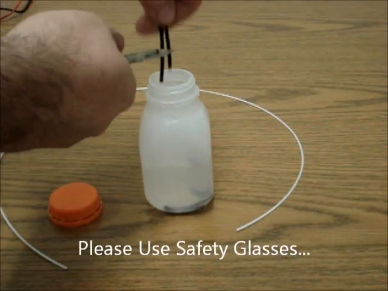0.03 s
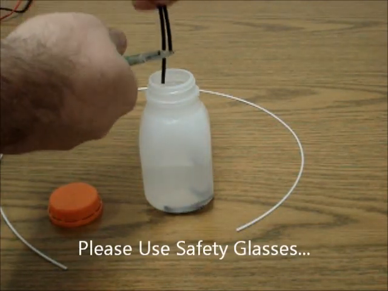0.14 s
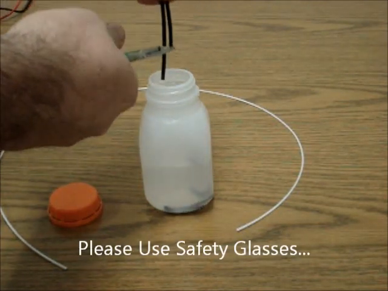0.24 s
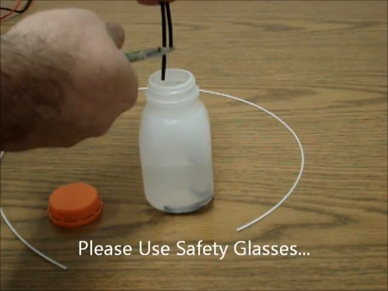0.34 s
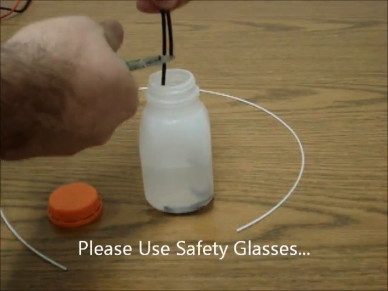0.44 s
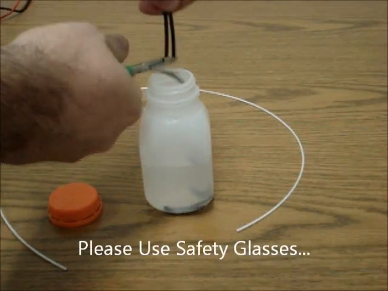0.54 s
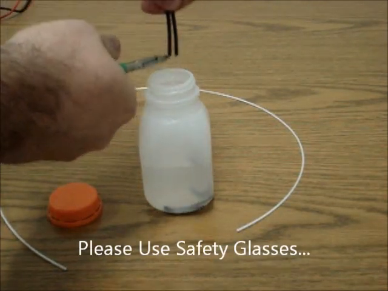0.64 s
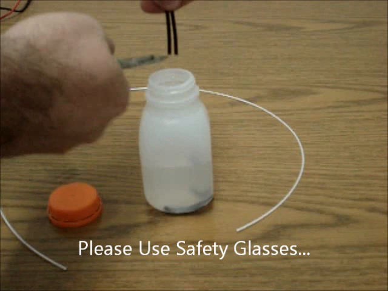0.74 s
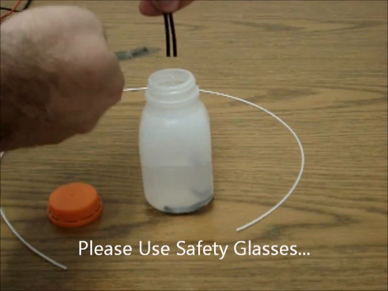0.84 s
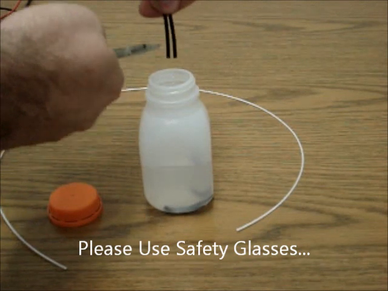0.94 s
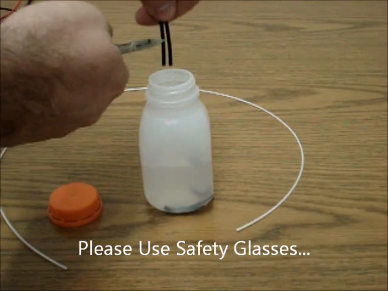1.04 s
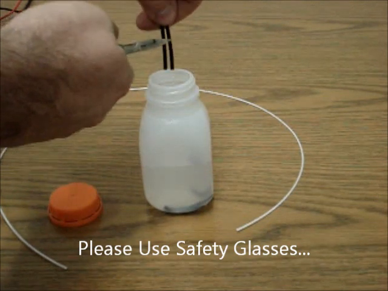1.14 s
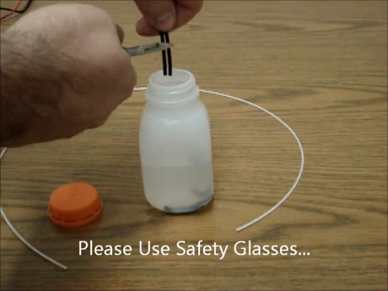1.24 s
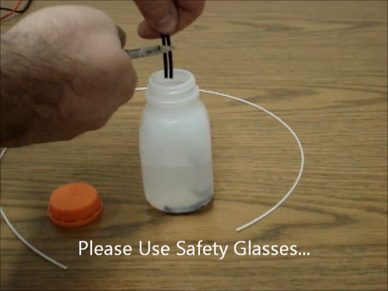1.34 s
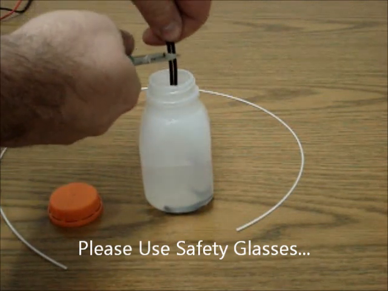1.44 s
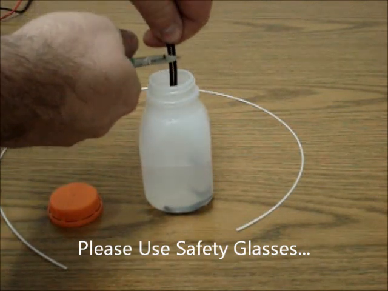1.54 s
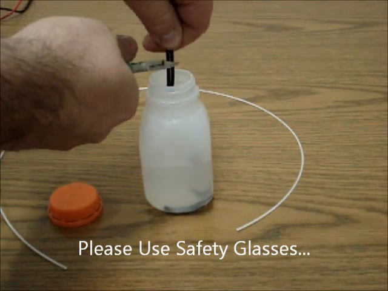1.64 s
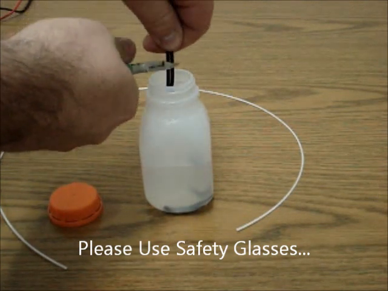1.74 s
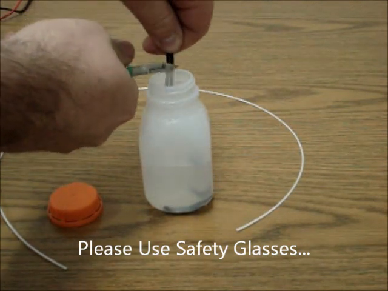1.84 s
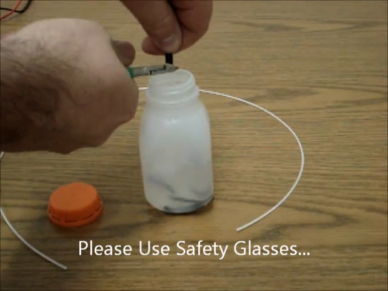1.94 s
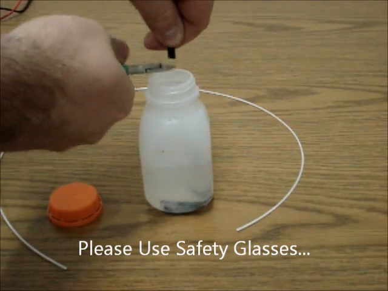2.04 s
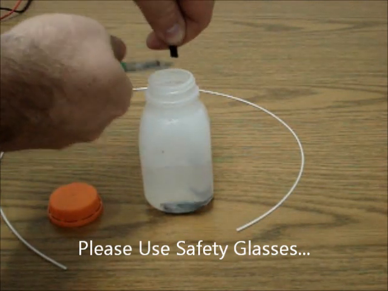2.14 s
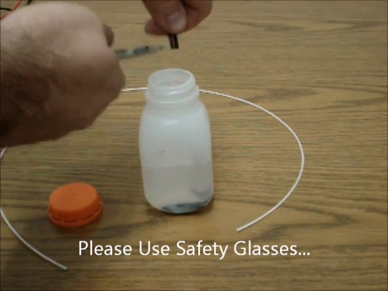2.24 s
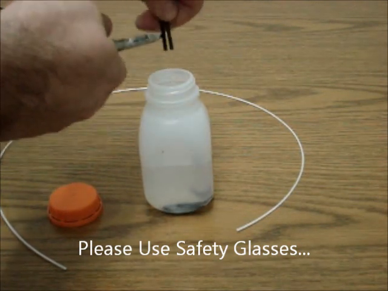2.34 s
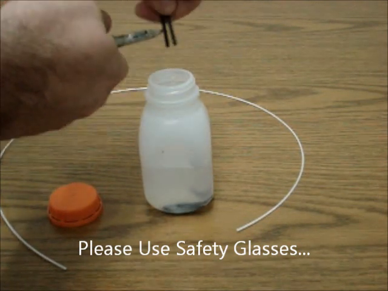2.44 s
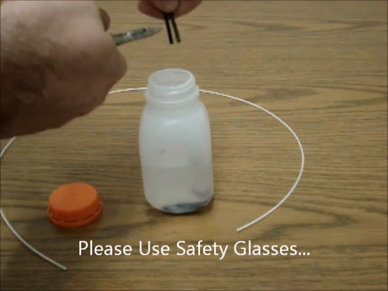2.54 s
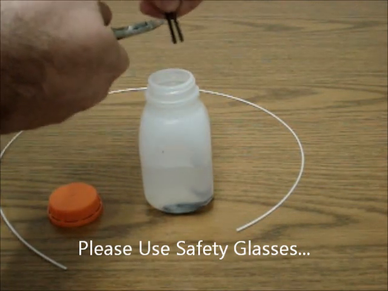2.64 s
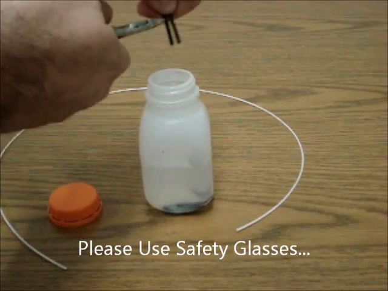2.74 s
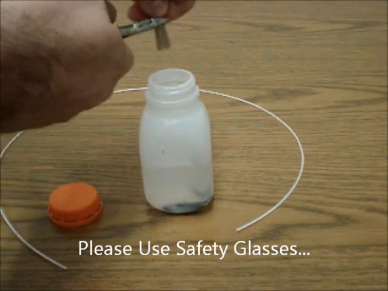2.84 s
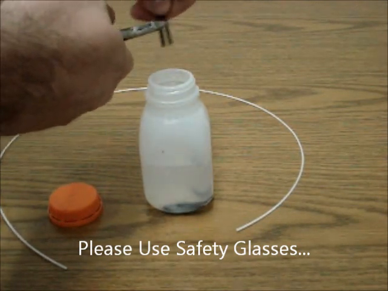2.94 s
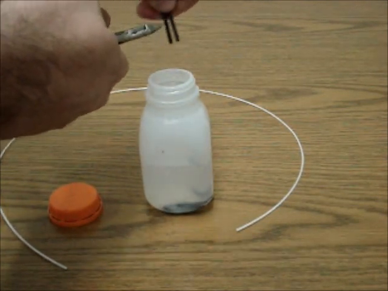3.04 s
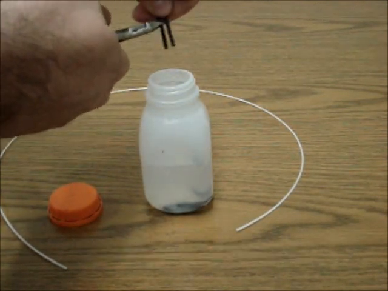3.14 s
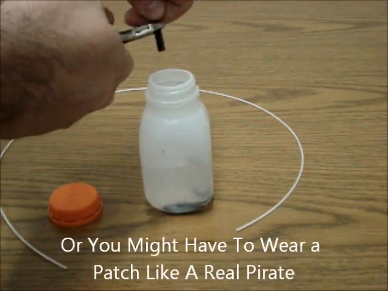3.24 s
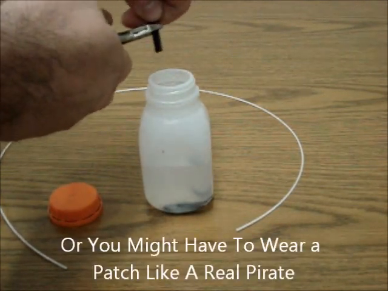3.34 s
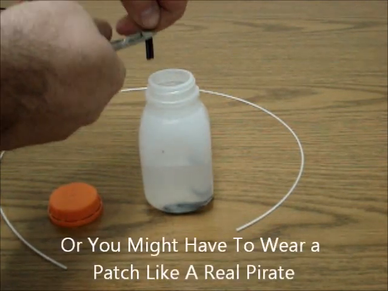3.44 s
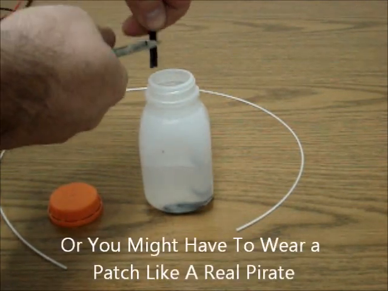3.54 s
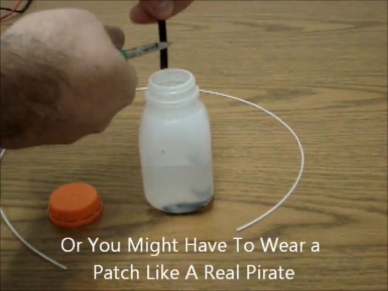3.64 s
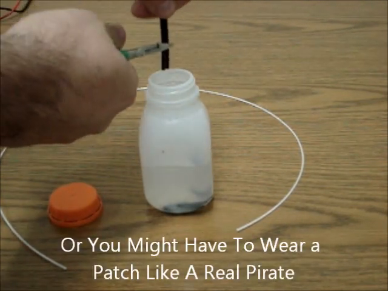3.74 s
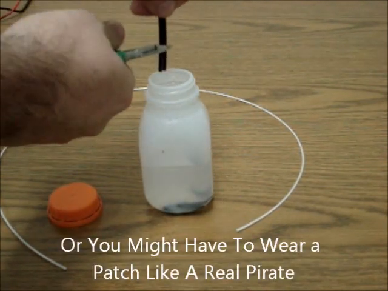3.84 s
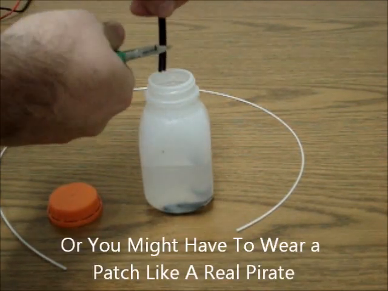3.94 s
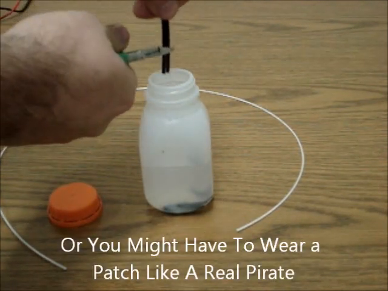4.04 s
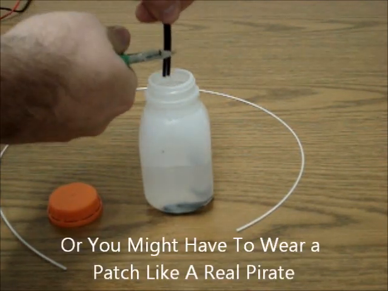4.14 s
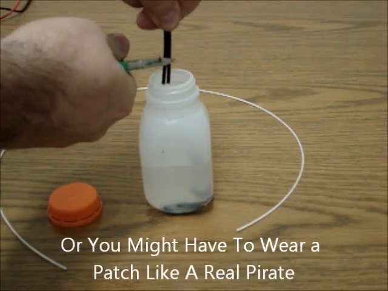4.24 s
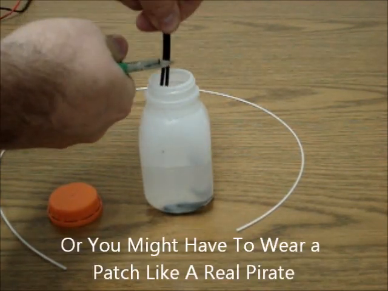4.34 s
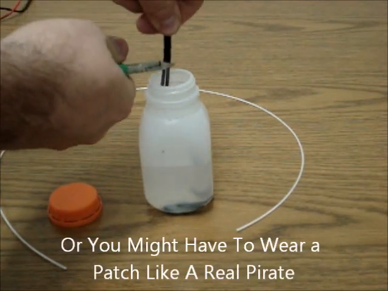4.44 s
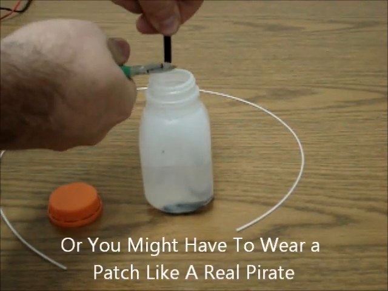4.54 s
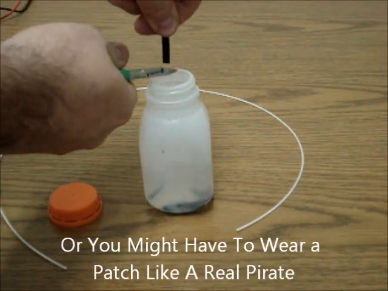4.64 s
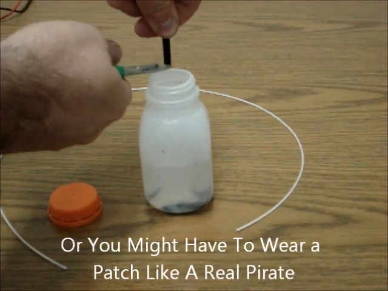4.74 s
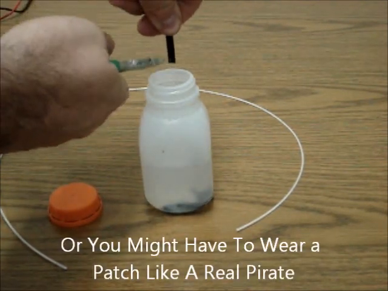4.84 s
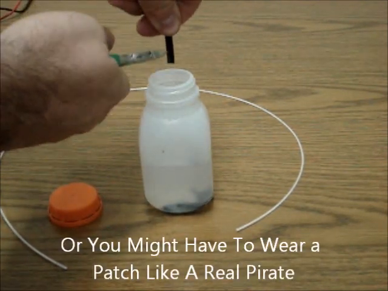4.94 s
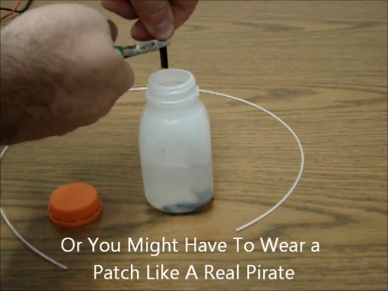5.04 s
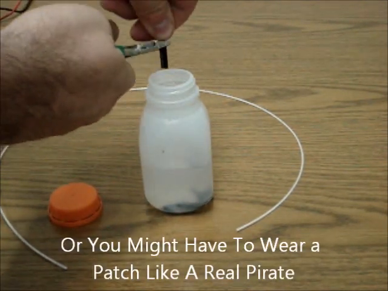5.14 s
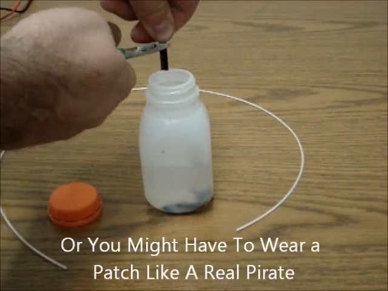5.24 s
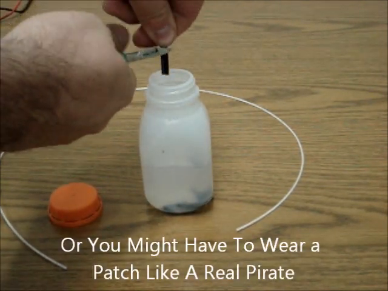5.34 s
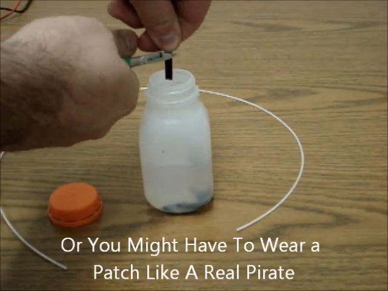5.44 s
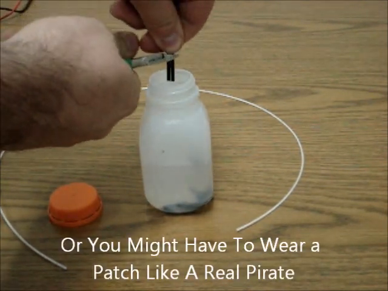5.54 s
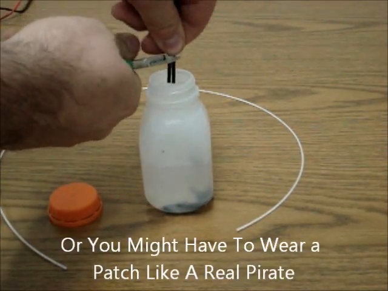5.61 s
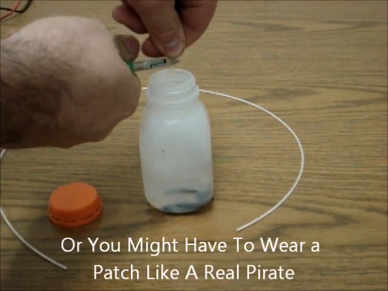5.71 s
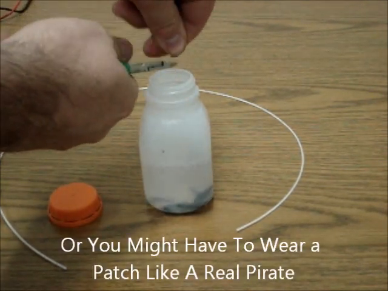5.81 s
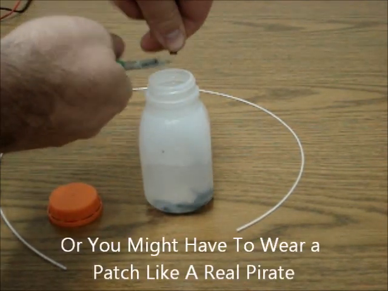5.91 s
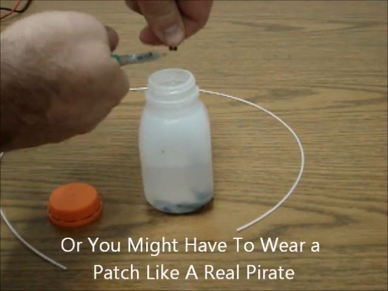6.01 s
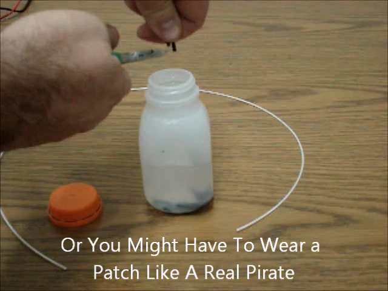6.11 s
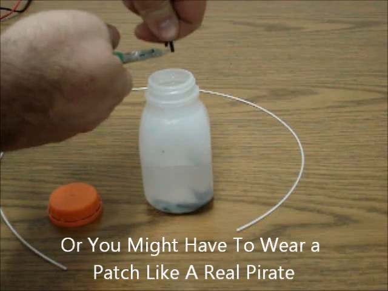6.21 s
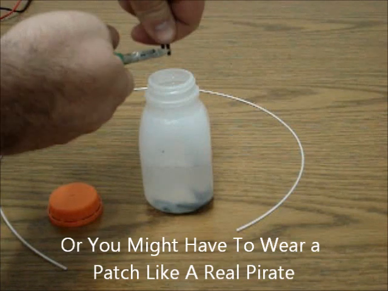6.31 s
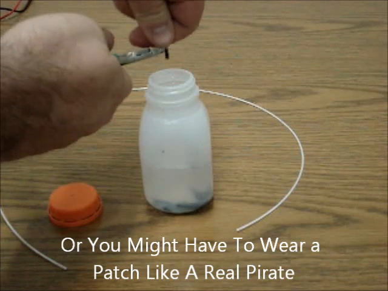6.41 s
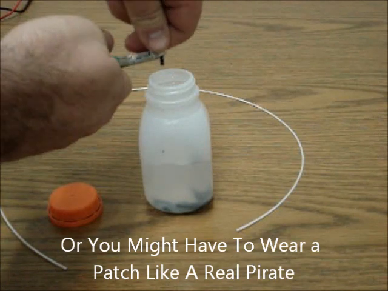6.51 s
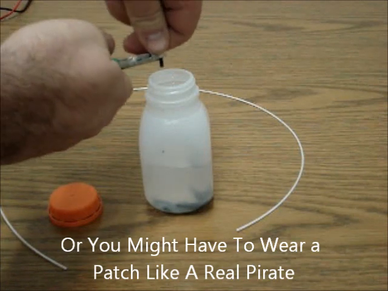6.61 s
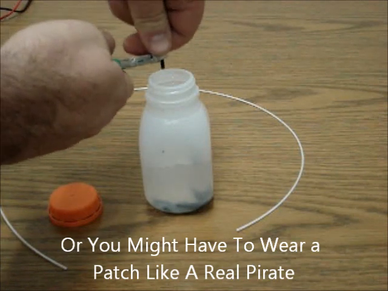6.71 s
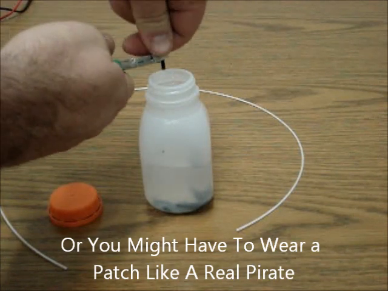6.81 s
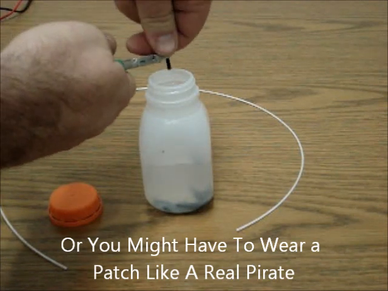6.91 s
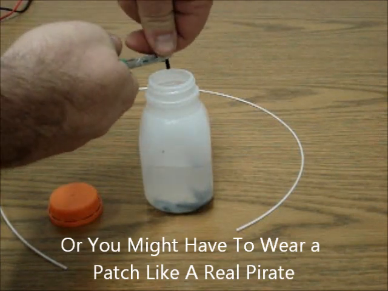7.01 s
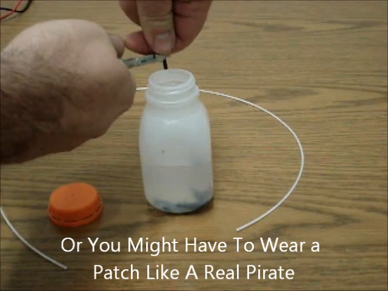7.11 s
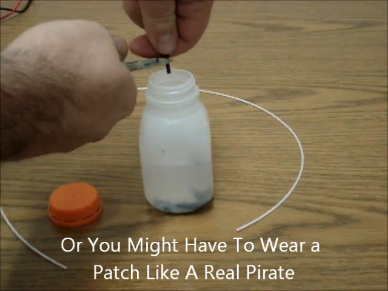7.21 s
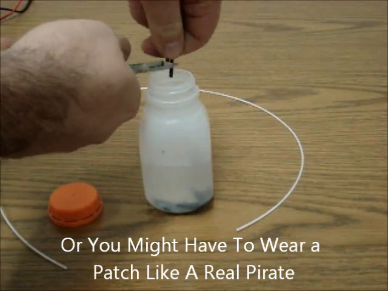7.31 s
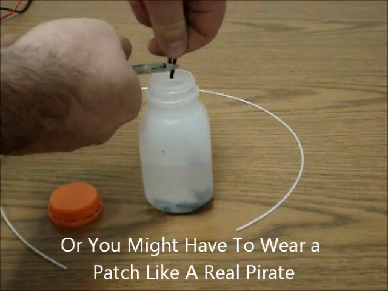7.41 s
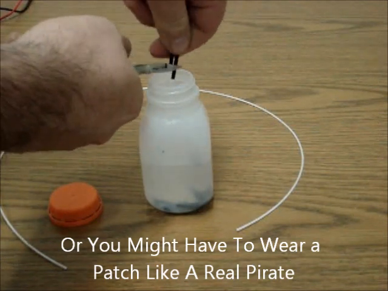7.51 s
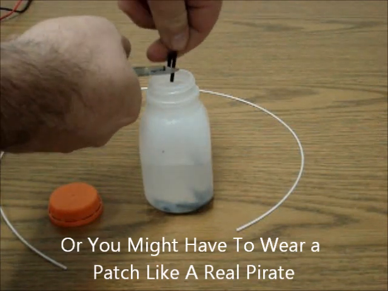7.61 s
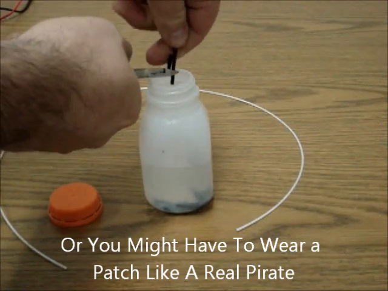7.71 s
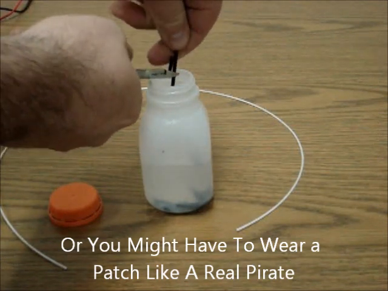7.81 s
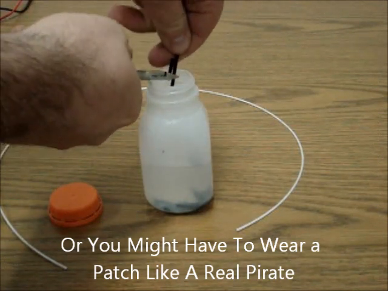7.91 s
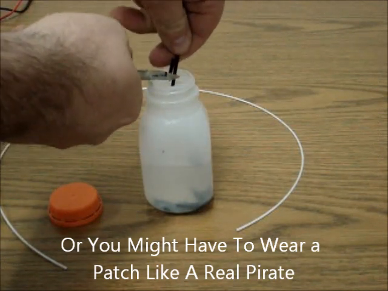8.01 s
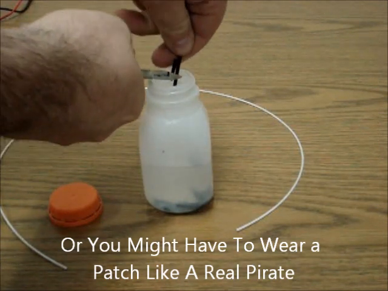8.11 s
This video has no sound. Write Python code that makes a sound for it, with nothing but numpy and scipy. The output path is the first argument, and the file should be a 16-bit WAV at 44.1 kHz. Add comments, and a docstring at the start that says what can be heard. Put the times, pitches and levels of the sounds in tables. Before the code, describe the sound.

A quiet bench, recorded close with a limited, slightly dull top end. Cutter jaws snap crisply with a little puff of bass, then plastic pieces clatter for a fraction of a second against a ringing bottle wall and skip dryly over the bench. This happens four times at uneven intervals, with short room echoes. Underneath run soft hiss, rumble, a buzzing camera motor, thin pings and faint whines.

```python
"""Hand nippers snip plastic filament over an open plastic bottle on a bench, close to a small camera.
A small tick comes first; then the jaws snap at 0.6 (two snaps in quick succession), 1.9, 4.5 and 5.7 s.
After each snap, filtered noise and decaying modes sound offcuts rattling in the bottle or skipping over
the bench, and a small hard room rings in decaying noise; low modes sound a nudged bench at 4.6 and 8 s.
Throughout: a motor ticking at the field rate, with surges, short pings, a low rumble, hiss and faint whines."""
import sys
import numpy as np
from scipy import signal
from scipy.fft import rfft, irfft
from scipy.io import wavfile
from scipy.ndimage import uniform_filter1d

SR = 44100
rng = np.random.default_rng(int(sys.argv[2]) if len(sys.argv) > 2 else 0)


def generate_wav(signal):
    """Clip the signal to [-1, 1] and save it as 16-bit WAV at the path in sys.argv[1]."""
    frames = np.transpose(np.atleast_2d(signal))
    scaled = np.clip(frames, -1, 1) * 32767
    pcm = np.round(scaled).astype(np.int16)
    wavfile.write(sys.argv[1], SR, pcm)


N = 359931  # samples


def undb(db):
    """Level law: an amplitude ratio is 10 to the power dB / 20."""
    return 10 ** (np.asarray(db) / 20)


def fade(t, t60):
    """Exponential damping: the level falls by 60 dB in t60 seconds."""
    return np.exp(-np.log(1000) * t / t60)


def rise(t, rise_s):
    """Finite contact time: a linear onset lasting rise_s seconds."""
    return np.minimum(t / rise_s, 1)


def band(x, lo_hz, hi_hz):
    """Band limitation: a Butterworth band-pass, scaled to rms 1."""
    sos = signal.butter(2, [lo_hz, hi_hz], "band", fs=SR, output="sos")
    y = signal.sosfilt(sos, x)
    return y / np.sqrt(np.mean(y ** 2))


def ring(modes, t):
    """Modal superposition: a struck body sounds as a sum of decaying (Hz, dB, t60 s) sines."""
    return sum(undb(db) * fade(t, t60) * np.sin(2 * np.pi * hz * t) for hz, db, t60 in modes)


def gain_at(spectrum, hz):
    """Spectral envelope: gain of (Hz, dB) points, joined on a log frequency axis."""
    point_hz, point_db = np.transpose(spectrum)
    return undb(np.interp(np.log(hz + 1), np.log(point_hz), point_db))


def add(track, start_s, sound):
    """Linear superposition: mix a sound in at start_s seconds."""
    i = int(start_s * SR)
    track[i:i + len(sound)] += sound[:N - i]


# jaws snapping through a strand; treble and thump are offsets to the jaw and puff modes:
# start_s [s], level_db [dB], treble_db [dB], thump_db [dB re level]
SNIP_EVENTS = [(0.6013, -8.5, -8.5, -17), (0.6028, -7.5, -7, -14), (1.9238, -5, -9, -4.5),
               (4.5404, -8.5, -2.5, -2.5), (5.6977, -4, -7, -5.5)]
# modes of jaws and strand together: nominal pitch_hz [Hz], level_db [dB], t60_s [s]
JAW_MODES = [(1605, -24, 0.04), (2008, -16.5, 0.019), (2256, -2, 0.0031), (3380, -7.5, 0.0013),
             (4670, -10, 0.03), (6400, -1, 0.0023), (7670, -12.5, 0.018), (8550, -18, 0.044)]
# bass modes of the puff of air: pitch_hz [Hz], level_db [dB], t60_s [s]
PUFF_MODES = [(30.4, -27.5, 0.13), (81.6, -25, 0.025), (232, -19, 0.0084)]


def snips():
    """Impulsive release: the jaws ring briefly as the strand parts and push a puff of air into the bass."""
    out, t = np.zeros(N), np.arange(SR // 8) / SR
    for start_s, level_db, treble_db, thump_db in SNIP_EVENTS:
        modes = [(hz * rng.normal(1, 0.026), db + treble_db * (hz > 4000), t60)
                 for hz, db, t60 in JAW_MODES]
        jaws = ring(modes, t) * rise(t, 0.00024)
        add(out, start_s, undb(level_db) * jaws)
        add(out, start_s, -undb(level_db + thump_db) * ring(PUFF_MODES, t))
    return out


def rattle(t, low_db, edge_db, treble_db, hz, rise_s, t60):
    """Random micro-impacts: four bands of grainy noise whose treble dies first, levels re the middle band."""
    grains = undb(1.5 * rng.exponential(size=len(t)))
    noise = rng.standard_normal((4, len(t))) * grains
    # the contacts come in clumps a few milliseconds long, each band in its own
    clump = int(0.003 * SR)
    clumping = np.sqrt(clump) * uniform_filter1d(rng.standard_normal(noise.shape), clump, axis=1)
    noise *= undb(3 * clumping)
    low = undb(low_db) * band(noise[0], 510, 1530) * fade(t, 1.12 * t60)
    mid = band(noise[1], hz / 1.6, hz * 2.01) * fade(t, t60)
    edge = undb(edge_db) * band(band(noise[2], 4440, 5160), 4380, 5160) * fade(t, 0.78 * t60)
    high = undb(treble_db) * band(noise[3], 5470, 8930) * fade(t, 0.58 * t60)
    return (low + mid + edge + high) * rise(t, rise_s)


def strike(modes, hz, spread, selectivity):
    """Strike-point selection: favour the modes near one pitch, by selectivity in dB per octave squared."""
    return [(f * rng.normal(1, spread), db - selectivity * np.log2(f / hz) ** 2, t60)
            for f, db, t60 in modes]


# offcuts knocking about in the bottle, the pitch being the one that the wall answers best:
# start_s [s], rattle_db [dB], wall_db [dB], edge_db [dB re rattle], treble_db [dB re rattle],
# pitch_hz [Hz], middle-band rattle t60_s [s]
KNOCK_EVENTS = [(0.6062, -30, -53, 2, -6, 1900, 0.032), (0.6128, -25.5, -29, 4, 7.5, 550, 0.031),
                (0.6174, -41, -20.5, -6, 0, 976, 0.027), (0.625, -47, -36, -5, -9, 990, .016),
                (.646, -50, -34.5, -4, 0, 990, 0.11), (1.926, -28.5, -43, -0.5, -0.5, 1600, 0.13),
                (1.936, -21, -36, -23, -10, 1900, 0.053), (1.95, -31.5, -28.5, -1, -7, 820, 0.064),
                (1.9582, -36, -27, -3.5, 1, 1100, .06), (1.966, -38.5, -32, 3, -1, 1080, 0.095),
                (1.974, -40.5, -34.5, -3, -2, 840, 0.18), (2.0084, -38.5, -40, -8, -8, 1080, 0.065),
                (4.543, -30.5, -45, -2, 9.5, 1800, 0.055), (4.551, -31.5, -39, 3, -9, 1530, 0.1),
                (4.5735, -26, -34, -8.5, -2, 705, 0.041), (4.583, -34, -46, -7, -22, 1060, 0.05),
                (4.593, -28.5, -50, -17, -31, 1160, 0.055), (4.598, -31.5, -28, -7, -14, 720, 0.089),
                (4.6269, -32.5, -27.5, -9, -9, 1285, 0.032), (5.7, -30, -36.5, 1, 1.5, 1800, 0.045),
                (5.7083, -24.5, -38, -6, -6, 1540, 0.038), (5.715, -32.5, -37, -2, -23, 1620, 0.11),
                (5.7224, -28, -20, -5, 1.5, 1210, 0.063), (5.727, -41, -23, -7, -4, 680, 0.033),
                (5.738, -33, -41.5, -0.5, -8, 1850, 0.085), (5.8577, -42.5, -54.5, -1, 2, 1636, 0.022)]
# modes of the bottle wall: nominal pitch_hz [Hz], level_db [dB], t60_s [s]
BOTTLE_MODES = [(548, -18, 0.084), (713.3, -4, 0.059), (940, -9.5, 0.064), (1060, -8.5, 0.071),
                (1168, -4, 0.057), (1440, -4, 0.082), (1654, 4.5, 0.078), (1830, 7, 0.13),
                (1880, -19, 0.14), (2020, -9, .1), (2210, -13, .1)]
KNOCK_RISE_S, WALL_RASP_DB = 0.0018, -16.5  # the rasp is the wall's bass noise, re wall_db


def bottle_knocks():
    """Shell resonance: each offcut rattles and sets the bottle's wall ringing."""
    out, t = np.zeros(N), np.arange(SR // 4) / SR
    for start_s, rattle_db, wall_db, edge_db, treble_db, hz, t60 in KNOCK_EVENTS:
        wall = ring(strike(BOTTLE_MODES, hz, 0.0092, 160), t) * rise(t, KNOCK_RISE_S)
        low_db = wall_db + WALL_RASP_DB - rattle_db
        clatter = rattle(t, low_db, edge_db, treble_db, 1900, KNOCK_RISE_S, t60)
        add(out, start_s, undb(rattle_db) * clatter + undb(wall_db) * wall)
    return out


# offcuts skipping on the bench and small ticks of the tool:
# start_s [s], level_db [dB], low_db [dB re level], treble_db [dB re level], pitch_hz [Hz],
# middle-band rattle t60_s [s]
TICK_EVENTS = [(0.1242, -42, -34, -9, 1760, 0.029), (0.8137, -49, -15, -1, 2800, 0.077),
               (0.8169, -40.5, -43, -1.5, 1588, 0.093), (1.0072, -54, 2, -11, 2500, 0.066),
               (1.0111, -44, -5.5, -3.5, 1800, 0.068), (1.129, -49, -8.5, 2, 1830, .075),
               (1.1526, -53, -4.5, -1, 1870, 0.18), (1.2143, -57.5, -7, 1, 2260, 0.076),
               (1.254, -54, -4, -4.5, 2200, 0.12), (1.3178, -56.5, -16, -3.5, 1880, 0.14),
               (1.379, -50.5, -3.5, -3, 1910, .073), (1.4147, -58, -1, 2, 2310, 0.088),
               (2.1048, -46.5, -30, -17, 1870, .09), (2.165, -58.5, -23, 11.5, 4700, 0.062),
               (2.1844, -58, -27, 0, 4660, 0.055), (2.339, -61, -28, 7, 1710, .065),
               (4.7983, -49, -20, 1, 2760, .062), (4.821, -62, -20, 6, 3600, 0.051),
               (4.8425, -50, -11, -20, 2940, 0.039), (4.8965, -56, -20, 5, 2300, 0.028),
               (4.9712, -45, 4, 3, 2920, 0.0096), (4.9856, -50.5, 3.5, -25, 1290, 0.042),
               (5.9442, -47, -18, 0, 1760, 0.048), (5.96, -64, -9, 14.5, 1350, 0.078),
               (6.0944, -59.5, 7.5, 7, 1760, .032), (7.7313, -41, -25, -18, 2600, 0.023),
               (7.9822, -59.5, 2.5, -20, 3330, 0.11)]
# modes of a skipping offcut: nominal pitch_hz [Hz], level_db [dB]
STRAND_MODES = [(1340, -2), (1600, -17), (1880, -2.5), (2280, -2), (2730, -3), (2950, -3), (3310, -3),
                (3660, -4), (4720, 1)]
TICK_RISE_S, TICK_EDGE_DB = 0.0026, -11.5  # edge re treble
TICK_RING_DB, TICK_RING_SHARE = 6.5, 0.47  # ring re rattle, in level and in decay time


def bench_ticks():
    """Free-bar vibration: a dry clatter with the short ring of the offcut itself."""
    out, t = np.zeros(N), np.arange(SR // 4) / SR
    for start_s, level_db, low_db, treble_db, hz, t60 in TICK_EVENTS:
        modes = [(f, db, TICK_RING_SHARE * t60) for f, db in STRAND_MODES]
        strand = ring(strike(modes, hz, 0.0086, 110), t) * rise(t, TICK_RISE_S)
        clatter = rattle(t, low_db, treble_db + TICK_EDGE_DB, treble_db, hz, TICK_RISE_S, t60)
        add(out, start_s, undb(level_db) * (clatter + undb(TICK_RING_DB) * strand))
    return out


# the bench is nudged: start_s [s], level_db [dB]
BUMP_EVENTS = [(4.6, -41), (7.982, -40.5)]
# modes of the bench: pitch_hz [Hz], level_db [dB], t60_s [s]
BENCH_MODES = [(205.8, -13, 0.35), (588, -2, 0.079), (714, -5.5, 0.063)]


def bench_bumps():
    """Plate resonance: the nudged bench rings low, its amplitude roughened by noise."""
    out, t = np.zeros(N), np.arange(SR // 4) / SR
    for start_s, level_db in BUMP_EVENTS:
        rough = 1 + 0.69 * band(rng.standard_normal(len(t)), 67, 320)
        add(out, start_s, undb(level_db) * ring(BENCH_MODES, t) * rough * rise(t, 0.0022))
    return out


# the room's answer to a click: band centre_hz [Hz], relative tail level_db [dB], tail t60_s [s]
ROOM_BANDS = [(352, -34.5, 0.31), (684, -24, 0.28), (1150, -35, 0.37), (1805, -30, 0.42),
              (3290, -31.5, 0.48), (5180, -33, 0.54), (7020, -33, 0.55), (9600, -40, 0.82)]
EARLY_DB, EARLY_T60_S = 5, 0.02  # early echoes, re the tail


def room(x):
    """Reverberation by convolution: strong early echoes from bench and walls, then a slower banded tail."""
    t = np.arange(int(0.6 * SR)) / SR
    echo = np.zeros(len(t))
    for hz, db, t60 in ROOM_BANDS:
        decay = fade(t, t60) + undb(EARLY_DB) * fade(t, EARLY_T60_S)
        echo += undb(db) * band(rng.standard_normal(len(t)), hz / 1.56, hz * 1.216) * decay
    return undb(-25) * signal.fftconvolve(x, echo * rise(t, 0.0033))[:N]


# modes of the camera body: pitch_hz [Hz], level_db [dB re tick], t60_s [s]
BODY_MODES = [(2160, -15, 0.022), (2924, -7, 0.034), (3550, 1, 0.014), (4270, 1.5, 0.012),
              (5760, 1.5, 0.011), (6060, 3.5, 0.012), (7160, 5, 0.01)]
# the motor works harder for a moment:
# hardest_s [s], peak_db [dB], build_s [s], let_off_s [s], tilt_db [dB per octave]
MOTOR_SURGES = [(.21, -70, .06, 0.11, 0), (.558, -58.5, 0.034, .01, 7), (1.643, -56.5, 0.042, 0.066, -3),
                (2.13, -60, 0.027, 0.03, 3), (2.535, -54, .015, 0.016, 5), (2.73, -62.5, 0.036, .05, 0),
                (3.16, -61, 0.062, .02, -1), (3.33, -57, 0.022, 0.11, -6), (3.56, -59.5, 0.15, 0.036, -9),
                (4.113, -51, .03, 0.032, 12), (4.58, -51, 0.061, .06, 0), (4.2, -63, .03, .05, -3),
                (5.18, -57.5, 0.044, 0.027, -4), (6.164, -56.5, .05, 0.034, 10), (6.364, -66, .02, .04, -3),
                (7.25, -60, .03, 0.045, 6), (7.355, -52, 0.042, 0.034, 5), (7.482, -58, .025, .02, 4),
                (7.682, -59.5, 0.031, 0.019, -1)]
MOTOR_HZ, MOTOR_START_S, MOTOR_RISE_S = 59.94, 0.0078, 0.00081
MOTOR_IDLE_DB, MOTOR_WANDER_DB, SCRATCH_DB = -65.5, 2, 2  # scratch re the mean mode gain


def motor():
    """Periodic excitation: one tick a field drives body modes of drifting balance and a short scratch."""
    out, t = np.zeros(N), np.arange(SR // 20) / SR
    times = np.arange(MOTOR_START_S, N / SR, 1 / MOTOR_HZ)
    # doubling restores unit spread after the average over four ticks
    wander = 2 * uniform_filter1d(rng.standard_normal(len(times)), size=4)
    drift = 2 * uniform_filter1d(rng.standard_normal((len(times), len(BODY_MODES))), size=4, axis=0)
    idle = undb(MOTOR_IDLE_DB + MOTOR_WANDER_DB * wander)
    gains = np.outer(idle, np.ones(len(BODY_MODES)))
    octaves = np.log2(np.array(BODY_MODES)[:, 0] / 4800)
    for hardest_s, peak_db, build_s, let_off_s, tilt_db in MOTOR_SURGES:
        width = np.where(times < hardest_s, build_s, let_off_s)
        effort = np.exp(-((times - hardest_s) / width) ** 2)
        gains = np.hypot(gains, np.outer(effort, undb(peak_db + tilt_db * octaves)))
    onset = rise(t, MOTOR_RISE_S)
    shapes = np.array([ring([mode], t) for mode in BODY_MODES]) * onset
    noise = band(rng.standard_normal(N + len(t)), 1200, 6400)
    for start_s, gain, scatter in zip(times, gains, drift):
        add(out, start_s, gain * undb(2.0 * scatter) @ shapes)
        scratch = noise[int(start_s * SR):][:len(t)] * fade(t, 0.025) * onset
        add(out, start_s, gain.mean() * undb(SCRATCH_DB) * scratch)
    return out


# short thin tones: start_s [s], pitch_hz [Hz], peak_db [dB], length_s [s]
PING_EVENTS = [(.125, 2876, -62, 0.044), (1.443, 2890, -64, 0.056), (1.752, 4330, -63.5, 0.028),
               (2.523, 2850, -70, .08), (2.635, 4330, -69, 0.052), (2.852, 4330, -61, 0.028),
               (3.29, 2876, -64.5, 0.18), (5.15, 2876, -69, 0.099), (6.717, 1910, -75, 0.17),
               (7.021, 1920, -75, 0.17), (7.472, 1940, -73, .24), (7.47, 3820, -73, 0.2)]


def pings():
    """Amplitude modulation: faint sines swell and fade under half-sine envelopes."""
    out = np.zeros(N)
    for start_s, hz, peak_db, length_s in PING_EVENTS:
        t = np.arange(int(length_s * SR)) / SR
        swell = np.sin(np.pi * t / length_s)
        add(out, start_s, undb(peak_db) * swell * np.sin(2 * np.pi * hz * t))
    return out


# course of the low rumble, before its random sway: time_s [s], level_db [dB rms]
RUMBLE_LEVEL = [(0, -79), (.66, -69.5), (1.95, -69), (2.3, -73), (3.3, -67.5), (5.6, -68.5), (6.3, -71),
                (7.1, -68), (8.16, -68)]


def rumble():
    """Slowly modulated noise: a low band swells and sinks, with a random sway in level."""
    t = np.arange(N) / SR
    knots = np.arange(0, t[-1] + 1, 0.12)
    sway = np.interp(t, knots, rng.standard_normal(len(knots)))
    level_db = np.interp(t, *np.transpose(RUMBLE_LEVEL)) + 2.0 * sway
    return undb(level_db) * band(rng.standard_normal(N), 90, 850)


# spectral shape of the microphone hiss: frequency_hz [Hz], relative density_db [dB]
HISS_SHAPE = [(12, -33.5), (20, -5), (91, -8.5), (154, -2.5), (376, 0.5), (558, -1.5), (1510, -4),
              (2240, -4.5), (3780, -6.5), (4780, -8.5), (7670, -12), (9710, -11.5), (10500, -40),
              (13600, -51), (22000, -120)]
HISS_DB = -64  # dB rms


def hiss():
    """Spectral shaping: white noise coloured in the frequency domain and held at one rms level."""
    hz = np.arange(N // 2 + 1) * SR / N
    noise = irfft(rfft(rng.standard_normal(N)) * gain_at(HISS_SHAPE, hz), N)
    return undb(HISS_DB) * noise / np.sqrt(np.mean(noise ** 2))


# faint tones: pitch_hz [Hz], nominal level_db [dB rms], time over which the tone holds steady hold_s [s]
WHINE_TONES = [(1893, -84, .06), (3760, -82, 0.062), (7950, -86.5, 0.21), (7540, -82, 0.14),
               (7630, -83, 0.12), (7900, -86.5, 0.16)]


def whines():
    """Narrow-band modulation: one slow random signal wavers each sine's level and phase."""
    out, t = np.zeros(N), np.arange(N) / SR
    for hz, level_db, hold_s in WHINE_TONES:
        # the root restores unit spread after the moving average
        waver = uniform_filter1d(rng.standard_normal(N), int(hold_s * SR)) * np.sqrt(hold_s * SR)
        out += np.sqrt(2) * undb(level_db + 3 * waver) * np.sin(2 * np.pi * hz * t + waver)
    return out


def scene():
    """Superposition of sources: the hits with their room, over the steady background."""
    hits = snips() + bottle_knocks() + bench_ticks() + bench_bumps()
    background = motor() + pings() + rumble() + hiss() + whines()
    return (hits + room(hits) + background)[None]


def record(dry):
    """Low-pass filtering: the camera cuts the top with a steep elliptic filter at 10050 Hz."""
    sos = signal.ellip(7, 0.5, 48, 10050, fs=SR, output="sos")
    return signal.sosfilt(sos, dry)


dry = scene()
out = record(dry)
generate_wav(out)
```